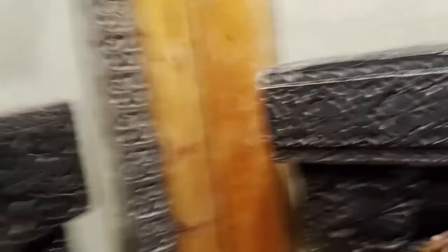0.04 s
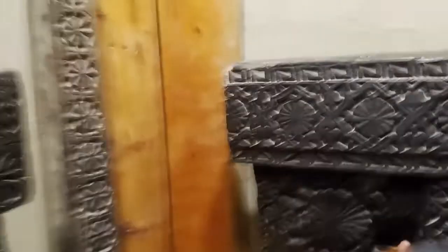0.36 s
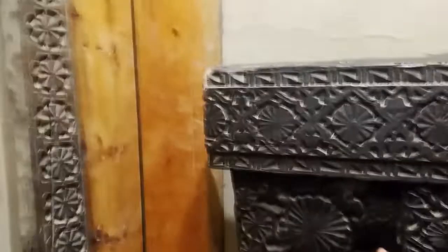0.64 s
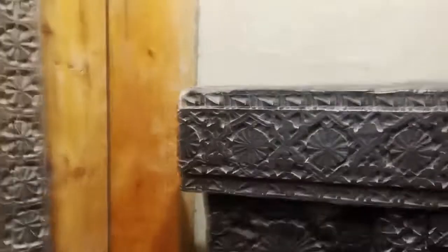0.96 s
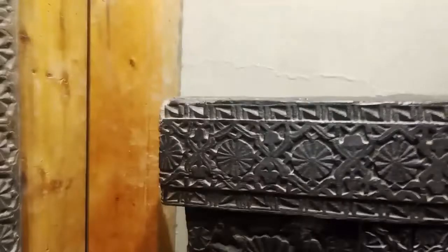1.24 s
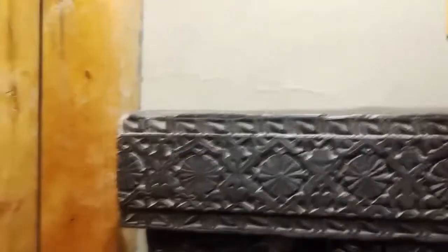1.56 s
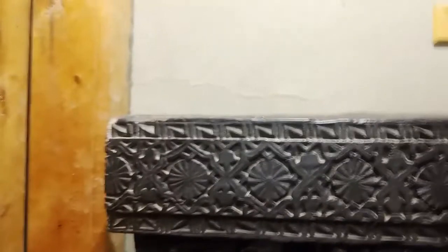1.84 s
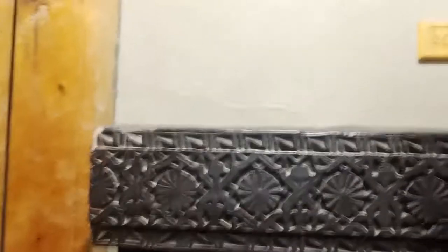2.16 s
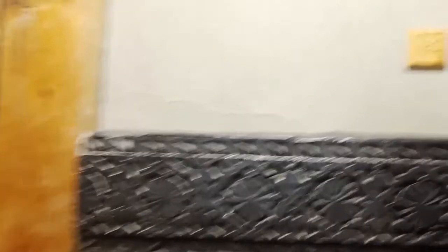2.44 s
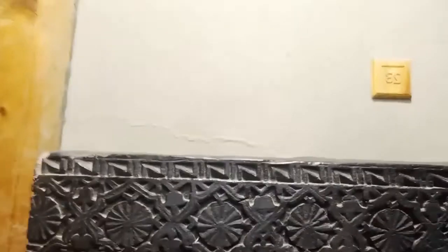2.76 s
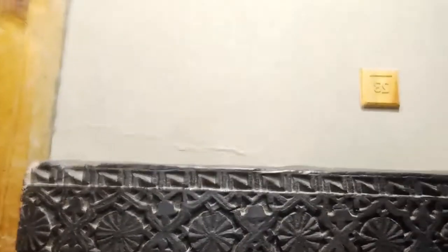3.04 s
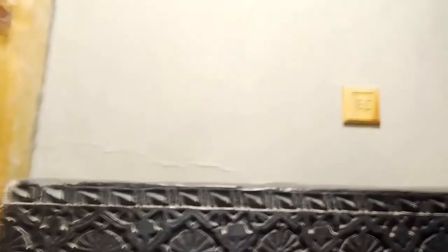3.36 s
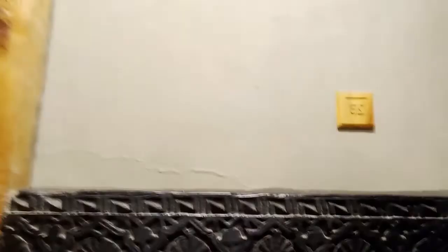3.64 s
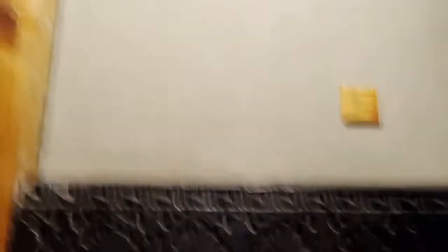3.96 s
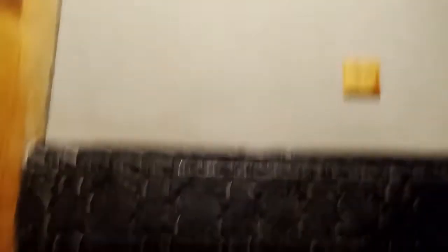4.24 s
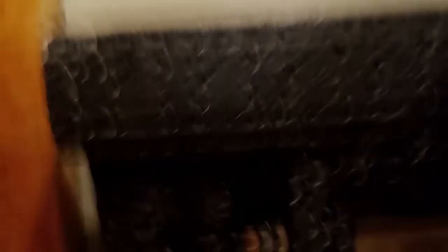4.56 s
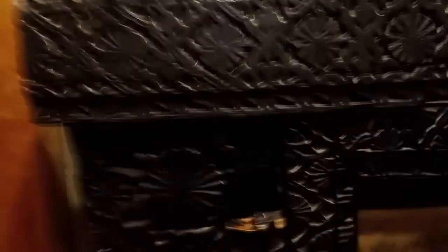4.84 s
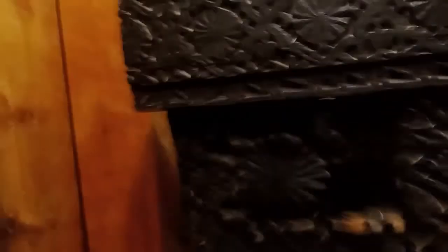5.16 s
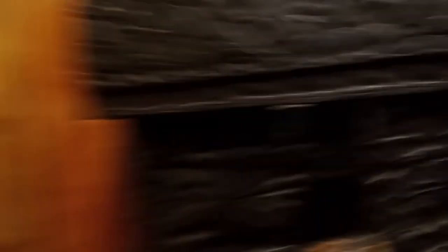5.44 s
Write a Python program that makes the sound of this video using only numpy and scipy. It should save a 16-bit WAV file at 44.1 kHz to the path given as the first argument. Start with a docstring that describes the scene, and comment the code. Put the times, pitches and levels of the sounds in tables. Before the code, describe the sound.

A wooden cupboard door knocks and scrapes while its loose metal lock rattles, with fingers bumping the microphone in a quiet room.

```python
"""In a quiet, hard-walled room, a carved wooden cupboard is handled. Its door scrapes on the frame by friction
and knocks against it; impacts excite the panel's modes and make the whole door boom. A hinge squeaks briefly,
and a loose metal lock rattles and rings. A sleeve brushes the wood in between, and fingers tick, bump and rub
on the case of a hand-held camera, right at its microphone."""
import sys
import numpy as np
from scipy import signal
from scipy.fft import rfft, irfft
from scipy.io import wavfile
from scipy.ndimage import uniform_filter1d

SR = 44100
rng = np.random.default_rng(int(sys.argv[2]) if len(sys.argv) > 2 else 0)


def int16_out(signal):
    """Quantize to a 16-bit WAV file."""
    q = np.round(np.clip(np.atleast_2d(signal).T, -1, 1) * 32767)
    wavfile.write(sys.argv[1], SR, q.astype(np.int16))


N = 246519
TAIL_S = np.arange(SR) / SR  # time after a blow
BINS_HZ = np.fft.rfftfreq(4096, 1 / SR)


def gain_of(db):
    """Amplitude ratio of a level in decibels."""
    return 10 ** (np.asarray(db) / 20)


def unit(x):
    """Normalisation to energy 1."""
    return x / np.sqrt(np.sum(x ** 2) + 1e-20)


def read(points, hz):
    """Interpolation on a log-frequency axis."""
    points_hz, value = np.transpose(points)
    return np.interp(np.log(hz + 1), np.log(points_hz + 1), value)


def add(mix, start_s, sound):
    """Superposition of a sound onto the mix."""
    part = mix[max(round(start_s * SR), 0):][:len(sound)]
    part += sound[:len(part)]


def causal(db):
    """Minimum phase: the sharp-fronted impulse response with the given gain on BINS_HZ."""
    log_gain = np.log(gain_of(np.concatenate([db, db[-2:0:-1]])))
    return np.fft.ifft(np.exp(np.conj(signal.hilbert(log_gain)))).real[:len(BINS_HZ)]


def band_db(db, low_hz, high_hz):
    """Energy level of a spectrum within a band."""
    return 10 * np.log10(np.mean(gain_of(db) ** 2 * (BINS_HZ > low_hz) * (BINS_HZ < high_hz)))


def burst(decay_s, rise_s):
    """Dense random contacts or reflections merge into noise that swells and decays."""
    return unit(rng.standard_normal(SR) * np.exp(-TAIL_S / decay_s) * (1 - np.exp(-TAIL_S / rise_s)))


def ring(modes, spread_db):
    """Modal vibration: damped sines of alternating sign, excited a little differently each time."""
    hz, db, t60_s = np.transpose(modes)[:, :, None]
    decay = gain_of(db + spread_db * rng.standard_normal(hz.shape) - 60 * TAIL_S / t60_s)
    sign = (-1) ** np.arange(len(modes))
    return unit(sign @ (decay * np.sin(2 * np.pi * hz * TAIL_S)))


def noise(spectrum):
    """Spectral shaping of white noise, rms 1."""
    shaped = rfft(rng.standard_normal(N)) * gain_of(read(spectrum, np.fft.rfftfreq(N, 1 / SR)))
    return unit(irfft(shaped, N)) * np.sqrt(N)


def strokes(rows, rest_db):
    """Sliding level in dB follows speed: one arch per stroke over a resting level."""
    speed = np.full(N, gain_of(rest_db))
    for start_s, length_s, db in rows:
        arch = np.sin(np.pi * np.arange(0, length_s, 1 / SR) / length_s)
        add(speed, start_s, gain_of(db) * abs(arch) ** 1.1)
    return 20 * np.log10(speed)


def friction(level_db, spectrum, grain_db):
    """Stick-slip friction: hiss that catches and slips every few milliseconds."""
    grain = unit(uniform_filter1d(rng.standard_normal(N), size=200)) * np.sqrt(N)
    return noise(spectrum) * gain_of(level_db + grain_db * grain)


# background spectrum: frequency_hz, level_db
AIR_SPECTRUM = [(15, -24.5), (25, -10), (70, 11), (145, 9.5), (256, -0.5), (988, -7.5), (1190, -8),
                (1610, -2.5), (3520, -33.5), (5880, -15.5), (10100, -41), (12200, -58), (16000, -45)]

def room_air():
    """Stationary noise: the faint, low hush of the room."""
    return gain_of(-74) * noise(AIR_SPECTRUM)


# wall reflections: frequency_hz, t60_s, level_db
ROOM_DECAY = [(99.1,0.62,7),(253,0.76,6),(690,0.6,6.5),(1420,0.57,0),(3020,0.48,2),(6900,0.39,-0.5),(8900,0.36,0),(16100,0.05,-14)]

def room(rise_s):
    """Reverberation: a diffuse tail whose treble is absorbed first."""
    hz, t, spectra = signal.stft(rng.standard_normal(SR), SR, nperseg=256)
    t60_s, db = (read(np.array(ROOM_DECAY)[:, [0, k]], hz)[:, None] for k in (1, 2))
    tail = signal.istft(spectra * gain_of(db - 60 * t / t60_s), SR)[1][:SR]
    return unit(tail * (1 - np.exp(-TAIL_S / rise_s)))


# cloth sliding on wood: start_s, length_s, level_db
SLEEVE_STROKES = [(0, 0.077, -63.5), (.41, 0.18, -78), (.66, .21, -64), (.755, 0.047, -62),
                  (.96, 0.6, -69.5), (1.54, 0.44, -61), (2.92, 0.52, -74.5), (3.57, 0.14, -63.5),
                  (4.06, 0.71, -72.5), (4.55, 0.52, -65.5), (5.22, 0.37, -72.5)]
# its soft hush and the fizz of a fast stroke: frequency_hz, level_db
HUSH_SPECTRUM = [(60,-19),(130,-12.5),(230,-3.5),(450,-3),(800,-10),(1400,-15.5),(2200,-10),(3200,-9.5),(5500,-10),(8000,-16.5),(11000,-30),(16000,-53)]
FIZZ_SPECTRUM = [(1000,-23.5),(3200,-1),(6500,-1),(10000,-3.5),(13000,-16),(16000,-5)]

def sleeve(fizz_db=-6, fizz_slope=1.6):
    """Cloth friction brightens with speed: the fizz grows faster than the hush."""
    db = strokes(SLEEVE_STROKES, rest_db=-81)
    fast_db = db.max() + fizz_db + fizz_slope * (db - db.max())
    return friction(db, HUSH_SPECTRUM, grain_db=1.3) + friction(fast_db, FIZZ_SPECTRUM, grain_db=0.8)


# a finger drags on the camera: start_s, length_s, level_db
FINGER_STROKES = [(4.95, 0.27, -74.5), (5.29, 0.12, -60), (5.37, 0.21, -63)]
# response of its case: frequency_hz, level_db
CASE_SPECTRUM = [(100,-21),(400,-15.5),(620,2),(820,4.5),(1100,-2.5),(1600,-6.5),(3000,-36),(8000,-36.5)]

def finger_rub():
    """Skin friction, coloured by the resonance of the case."""
    return friction(strokes(FINGER_STROKES, rest_db=-100), CASE_SPECTRUM, grain_db=0.5)


# the hand pushes on the camera: start_s, level_db
HAND_BUMPS = [(.66, -50), (.735, -57), (0.777, -46.5), (2.088, -52.5), (2.506, -41.5), (2.529, -35),
              (2.547, -44), (3.211, -39), (3.264, -52), (4.86, -40), (4.957, -52), (5.253, -52.5),
              (5.284, -38)]

def hand_bumps(pitch_hz=90, decay_s=0.0025):
    """A soft impact spreads its force in time, leaving only a dull, low pulse."""
    out, age = np.zeros(N), TAIL_S / decay_s
    pulse = age * np.exp(1 - age) * np.sin(2 * np.pi * pitch_hz * TAIL_S)
    for start_s, db in HAND_BUMPS:
        add(out, start_s, gain_of(db) * pulse)
    return signal.lfilter(*signal.butter(2, 65, "highpass", fs=SR), out)


# fingers tick on the case: start_s, level_db, pitch_hz
CASE_TICKS = [(.121, -25.5, 680), (.426, -39, 580), (.974, -36, 516), (2.088, -34.5, 617),
              (2.536, -24.5, 530), (3.264, -25.5, 680), (4.979, -29.5, 755), (4.997, -39, 635),
              (5.065, -37, 776), (5.085, -41.5, 557), (5.13, -39.5, 592), (5.176, -45, 610),
              (5.202, -46, 554), (5.242, -43, 549), (5.249, -45, 713), (5.28, -40.5, 794),
              (5.286, -35.5, 398), (5.302, -32.5, 846), (5.35, -35, 770), (5.369, -39.5, 590)]
# a tick's bright snap: frequency_hz, level_db
SNAP_SPECTRUM = [(500,-7.5),(2000,19),(4000,3),(6500,12),(9000,-13),(16000,-13)]

def case_ticks(gain_db=4, decay_s=0.00032, lag_s=0.00102, firm_db=-25.5, snap_db=-20, snap_slope=1.79):
    """A heavily damped resonance gives a dry tick; its snap grows steeply with firmness."""
    pulses, snaps, age = np.zeros(N), np.zeros(N), TAIL_S / decay_s
    envelope = age * np.exp(1 - age)
    snap = unit(causal(read(SNAP_SPECTRUM, BINS_HZ)))
    for start_s, db, hz in CASE_TICKS:
        add(pulses, start_s + lag_s, gain_of(db + gain_db) * envelope * np.cos(2 * np.pi * hz * TAIL_S))
        add(snaps, start_s + lag_s, gain_of(snap_db + snap_slope * (db - firm_db)) * snap)
    return signal.lfilter(*signal.butter(2, [270, 2100], "bandpass", fs=SR), pulses) + snaps


# brief drops in the cupboard's level: start_s, length_s, depth_db
LEVEL_DIPS = [(0.141, 0.22, -11.5), (2.557, 0.095, -12), (3.286, 0.22, -10)]

def dips():
    """Amplitude modulation: the cupboard's sound sinks and recovers just after each firm tick."""
    db = np.zeros(N)
    for start_s, length_s, depth_db in LEVEL_DIPS:
        add(db, start_s, depth_db * np.sin(np.pi * np.arange(0, length_s, 1 / SR) / length_s))
    return gain_of(db)


# the door drags on its frame: start_s, length_s, level_db
DOOR_SCRAPES = [(.72, 0.07, -69), (1.146, 0.095, -45), (2.172, 0.078, -49.5), (4.512, 0.041, -38)]
# response of the wood, scraped or struck: frequency_hz, level_db
WOOD_SPECTRUM = [(60,-43.5),(150,-26.5),(400,-18),(700,-17.5),(1000,-11),(1300,-1),(1750,-2.5),(2200,-3.5),(3000,-8),(4300,-14.5),(5600,-10.5),(7000,-18.5),(10000,-30.5),(16000,-39.5)]

def door_scrapes(wet_db=-3):
    """Dry friction excites the wood, and the room reverberates."""
    rub = friction(strokes(DOOR_SCRAPES, rest_db=-120), WOOD_SPECTRUM, grain_db=1.5)
    return rub + gain_of(wet_db) * signal.fftconvolve(rub, room(rise_s=0.0044))[:N]


# the hinge sticks and slips: start_s, level_db
HINGE_SLIPS = [(0.054,-20),(0.0566,-12.5)]
# its modes: frequency_hz, level_db, t60_s
HINGE_MODES = [(1290,-1,.08),(2280,-8,.05),(2980,0,.055),(3180,0,.06),(3400,-4,.05),(3900,-7,.05)]

def hinge_squeak(wet_db=-13):
    """Stick-slip friction: each sudden slip of the hinge rings briefly and brightly."""
    out = np.zeros(N)
    for start_s, db in HINGE_SLIPS:
        ping = ring(HINGE_MODES, spread_db=0.76)
        echo = unit(signal.fftconvolve(ping, room(rise_s=0.0022))[:SR])
        add(out, start_s, gain_of(db) * (ping + gain_of(wet_db) * echo))
    return out


# the door is pushed or pulled without a clack: start_s, level_db, pitch_hz
DOOR_THUDS = [(.658, -56, 104.7), (.764, -43.5, 200), (1.133, -45.5, 249), (1.417, -49.5, 198),
              (2.205, -31.5, 225), (3.198, -35.5, 176.8), (4.45, -42, 185), (4.466, -33.5, 174),
              (4.511, -18.5, 255)]

def shoves(knock_hz=302, rattle_hz=222, lag_s=0.001):
    """Momentum transfer: besides the thuds, every knock and rattle pushes the door."""
    kinds = [(DOOR_KNOCKS, knock_hz), (LOCK_RATTLES, rattle_hz)]
    return DOOR_THUDS + [(s + lag_s, shove_db, hz) for rows, hz in kinds for s, _, shove_db, *_ in rows]


# low modes of the whole door: frequency_hz, level_db, t60_s
DOOR_MODES = [(112,-17,.35),(167,-3,.5),(204,0,.55),(230,-9,.35),(260,-3,.5),(287,-2,.45),(341,-8,.4),(362,-3.5,.55),(476,-6,.55),(612,-10,.5),(755,-11,.5)]

def door_boom(gain_db=19, thump_db=-6, wet_db=-4, width_octaves=0.79):
    """Resonance: a band-limited shove excites the door's low modes and fills the room."""
    out = np.zeros(N)
    for start_s, db, hz in shoves():
        push = causal(-10 * np.log10(1 + (np.log2((BINS_HZ + 1) / hz) / width_octaves) ** 6))
        swing = ring(DOOR_MODES, spread_db=1) * (1 - np.exp(-TAIL_S / 0.00061))
        thump = unit(signal.fftconvolve(burst(decay_s=0.012, rise_s=0.0044), push)[:SR])
        boom = unit(signal.fftconvolve(swing, push)[:SR])
        echo = unit(signal.fftconvolve(room(rise_s=0.011), push)[:SR])
        sound = boom + gain_of(thump_db) * thump + gain_of(wet_db) * echo
        add(out, start_s, gain_of(db + gain_db) * sound)
    # a panel radiates little below its lowest mode
    radiation = causal(read([(50, -16.5), (110, 2.0), (160, 3.0), (1000, -1.5)], BINS_HZ))
    return signal.fftconvolve(out, radiation)[:N]


def dispersed_click(delay_s):
    """Bending-wave dispersion: treble crosses the board first, 1 kHz after delay_s."""
    return irfft(np.exp(-4j * np.pi * delay_s * np.sqrt(1000 * BINS_HZ)))[:len(BINS_HZ)]


def impacts(rows, spectrum, modes, *, gain_db, body_db, push_db, edge_db, sparkle_db, dull_slope,
            spot_db, spot_octaves, chatter_db, chatter_s, frame_db, frame_s, ring_db, wet_db):
    """Source and filter: click, chatter and reverberation take the body's colour while its modes ring."""
    out = np.zeros(N)
    frame = gain_of(frame_db) * burst(frame_s, rise_s=0.0096)  # the cupboard's dense, short modes
    frame[0] += 1  # direct path
    click = dispersed_click(delay_s=0.001217)
    for start_s, clack_db, shove_db, hardness_db, click_db, spot_hz in rows:
        # the struck spot sets a resonance, the shove fills out the body, hardness lifts the treble
        spot = np.exp(-(np.log2((BINS_HZ + 1) / spot_hz) / spot_octaves) ** 2)
        colour = read(spectrum, BINS_HZ) + spot_db * spot
        body = 20 * np.log10(gain_of(clack_db + body_db) + gain_of(shove_db + push_db))
        low = body - band_db(colour, 450, 1000)
        mid = clack_db - band_db(colour, 1000, 2500)
        high = clack_db + hardness_db + edge_db - band_db(colour, 3000, 9000)
        dull = dull_slope * min(hardness_db, 0)  # a soft contact loses its very top first
        top = clack_db + hardness_db + dull + sparkle_db - band_db(colour, 9500, 16000)
        balance = [(800, low), (1350, mid), (2100, mid), (3200, high), (7500, high), (11000, top)]
        response = causal(colour + read(balance, BINS_HZ))
        chatter = gain_of(chatter_db) * burst(chatter_s, rise_s=0.0021)
        echo = gain_of(wet_db) * room(rise_s=0.0027)
        contact = signal.fftconvolve(chatter + echo, unit(frame))[:SR]
        add(contact, 0, gain_of(click_db) * click)
        clack = signal.fftconvolve(contact, response)[:SR]
        ringing = gain_of(clack_db + ring_db) * ring(modes, spread_db=3)
        add(out, start_s, gain_of(gain_db) * (clack + ringing))
    return out


# play in the lock: start_s, clack_db, shove_db, hardness_db, click_db
LOCK_RATTLES = [(0.056, -35, -54, -11, 4), (0.475, -70.5, -65, 18, -5), (1.548, -49.5, -53.5, 3.5, -7),
                (2.171, -38.5, -27, -9, -5), (2.1847, -28, -36.5, 1, -7), (2.2748, -25, -33, -2.5, -3.5),
                (2.3173, -29, -46, -4, 2.5), (2.3427, -31.5, -42.5, -5.5, 7.5), (2.3870, -31, -40, -2.5, 1),
                (2.4047, -58.5, -66, 14.5, 3), (2.6505, -60.5, -73.5, 11, -5),
                (3.134, -50.5, -58.5, -1.5, 1), (3.1557, -39.5, -44, -9, -12),
                (3.1906, -37.5, -34.5, 3, -12), (3.2011, -27.5, -44, -16, -3), (3.4398, -62, -91, 7, 16.5),
                (3.5198, -37.5, -47.5, -1, -2.5), (3.6652, -44, -48, -11.5, 9.5),
                (3.8083, -33.5, -42.5, -1, -19), (3.9772, -50.5, -71.5, -25, 5),
                (4.055, -51.5, -74, -3.5, 3), (4.1066, -59, -80, -1, 1), (4.2079, -50.5, -50.5, -1.5, 5.5),
                (4.352, -48.5, -56, -14.5, -1.5), (4.439, -30.5, -71, -1.5, 4),
                (4.8792, -79, -74.5, 31.5, 0), (5.2574, -61.5, -54.5, 12.5, 1)]
# response of the metal: frequency_hz, level_db
METAL_SPECTRUM = [(150,-11.5),(400,-6),(650,-9),(1000,-3),(1500,-7.5),(2100,-6),(2800,3.5),(4200,2),(5800,5),(7500,-3.5),(11000,-20.5),(16000,-28)]
# modes of the lock: frequency_hz, level_db, t60_s
LOCK_MODES = [(645,-11,.25),(935,-9,.3),(1052,-8,.25),(1222,7,.42),(1232,-7,.3),(1787,-6,.4),(1812,-11,.3),(2309,-13,.3),(2675,-7,.25),(2934,-11,.4),(3028,-11,.25),(3528,-12,.2),(4629,-14,.25)]

def lock_rattles(spot_hz=2690):
    """Impact across a clearance: the loose lock is always struck at the same spot and rings."""
    return impacts([(*row, spot_hz) for row in LOCK_RATTLES], METAL_SPECTRUM, LOCK_MODES, gain_db=6.0,
                   body_db=-21, push_db=-4, edge_db=2.5, sparkle_db=-9.5, dull_slope=7.2,
                   spot_db=-0.5, spot_octaves=0.26, chatter_db=8.5, chatter_s=0.005,
                   frame_db=1, frame_s=0.0024, ring_db=6.5, wet_db=4.5)


# wood on wood: start_s, clack_db, shove_db, hardness_db, click_db, spot_hz
DOOR_KNOCKS = [(.0024, -43.5, -51, -4.5, -1, 2120), (.0543, -34.5, -40, -24, 6.5, 1420),
               (.2923, -57, -101, -47, 15.5, 1190), (.3934, -49.5, -73, -9, -16, 1190),
               (.4356, -49, -56.5, -10, 7, 1380), (.7317, -30, -43, -20.5, 5, 1530),
               (.7756, -57, -62, 4, -12, 1520), (.812, -52, -72, -21, -5, 1470),
               (.9724, -44.5, -57, -4, -25, 1410), (1.1450, -19.5, -77, -15, 7.5, 1847),
               (1.2112, -9.5, -33, -15, 7, 1665), (1.2166, -12, -70, -18.5, -20, 1354),
               (1.5666, -46.5, -44.5, -3, 7, 1180), (2.042, -57, -58.5, -22, 1.5, 1590),
               (2.481, -34.5, -47, -15, 0, 1540), (2.6645, -39, -50, -11, 5, 1530),
               (2.7474, -57, -60.5, -22.5, 12, 1600), (4.5245, -22.5, -24.5, -3.5, 3.5, 1266),
               (4.5492, -29, -53, -6, 5, 2400), (4.5775, -18, -19.5, -18.5, 13.5, 1244),
               (4.5825, -17, -60, -8, -13, 1510)]
# modes of the door's panel: frequency_hz, level_db, t60_s
PANEL_MODES = [(1130,-9,.3),(1216,-2,.35),(1297,-8,.3),(1385,-6,.35),(1531,1.5,.45),(1585,-4,.38),(1712,0,.42),(1752,-6,.35),(1843,-4,.35),(1933,-10,.3),(2497,-11,.3),(2648,-9,.3),(3063,-10,.3)]

def door_knocks():
    """Impulse excitation: the door strikes its frame and the panel's modes ring."""
    return impacts(DOOR_KNOCKS, WOOD_SPECTRUM, PANEL_MODES, gain_db=5.0,
                   body_db=-20, push_db=-2.5, edge_db=4.0, sparkle_db=-12, dull_slope=0.25,
                   spot_db=9.5, spot_octaves=0.1, chatter_db=8.5, chatter_s=0.0043,
                   frame_db=-14.5, frame_s=0.017, ring_db=3, wet_db=3.5)


def scene():
    """Superposition of all sources, almost mono: only treble reflections differ between the ears."""
    blows = door_knocks() + lock_rattles()
    hand = case_ticks() + hand_bumps() + finger_rub()
    cupboard = blows + hinge_squeak() + door_boom() + door_scrapes()
    mono = dips() * cupboard + hand + sleeve() + room_air()
    scatter = signal.fftconvolve(mono, burst(decay_s=0.004, rise_s=0.0005))[:N]
    treble = causal(read([(1000, -62.5), (2000, -57.5), (4000, -28), (12000, -19.0)], BINS_HZ))
    side = signal.fftconvolve(scatter, treble)[:N]
    return np.array([mono + side, mono - side])


def record(dry):
    """Band limiting: the microphone's bass roll-off and a steep treble cut."""
    lean = signal.lfilter(*signal.butter(2, 65, "highpass", fs=SR), dry)
    lowpass = signal.firwin(511, 16300, window=("kaiser", 9), fs=SR)
    return signal.oaconvolve(lean, lowpass[None], "same")


dry = scene()
out = record(dry)
int16_out(out)
```